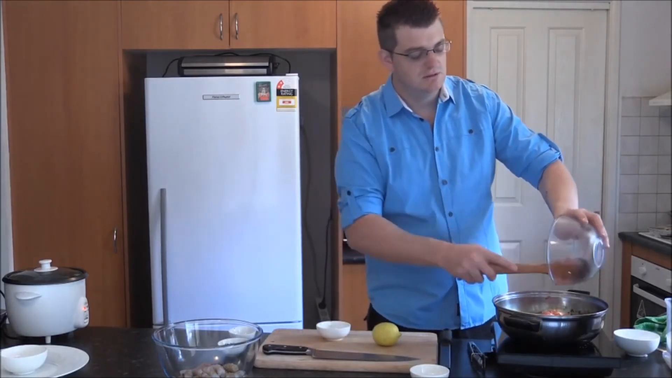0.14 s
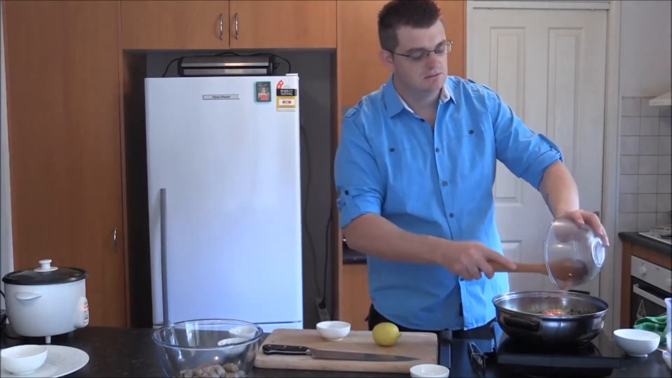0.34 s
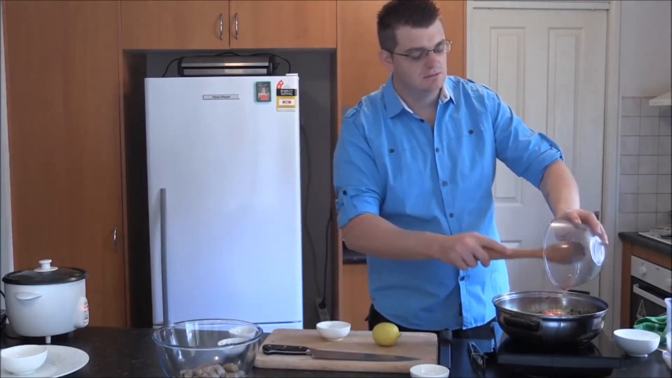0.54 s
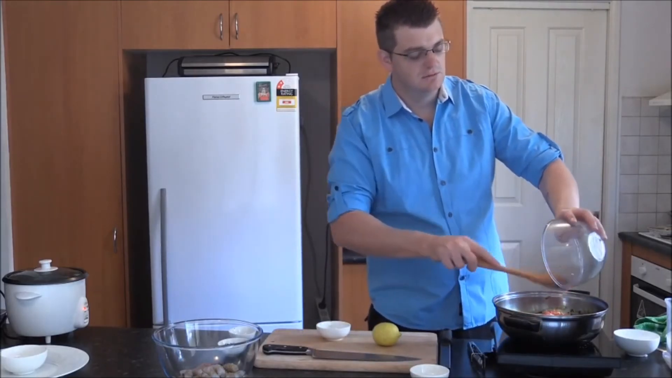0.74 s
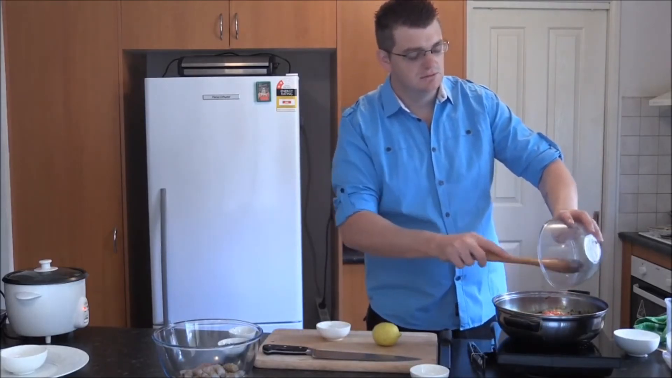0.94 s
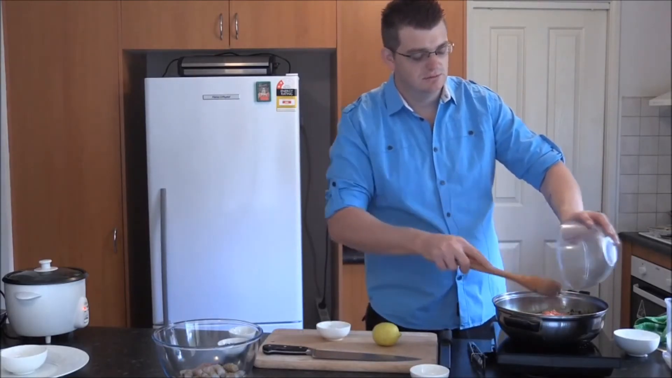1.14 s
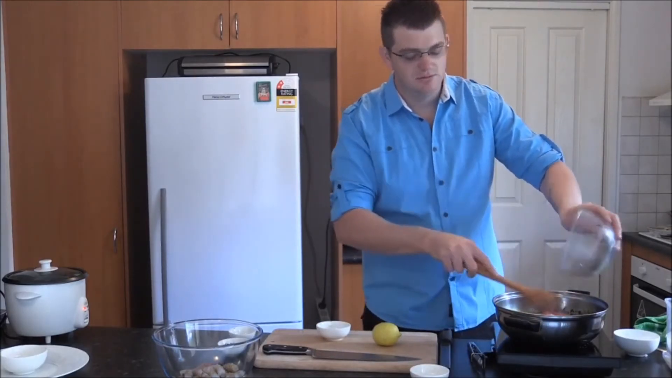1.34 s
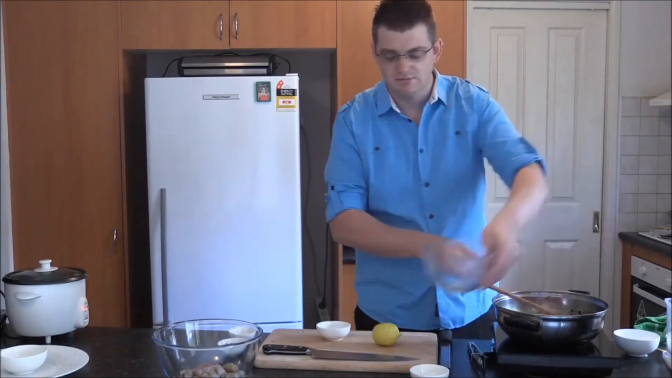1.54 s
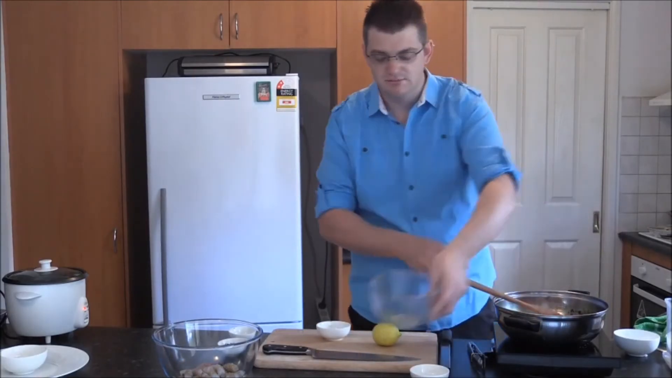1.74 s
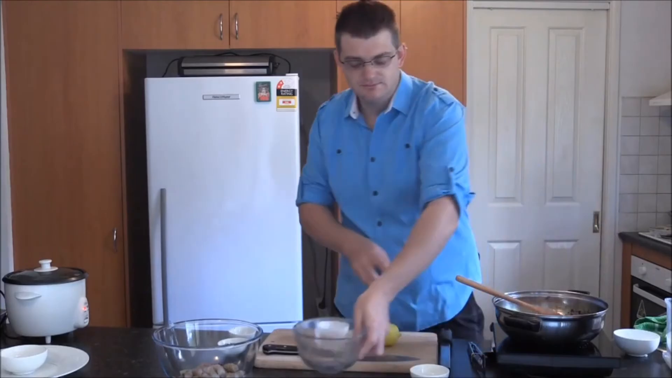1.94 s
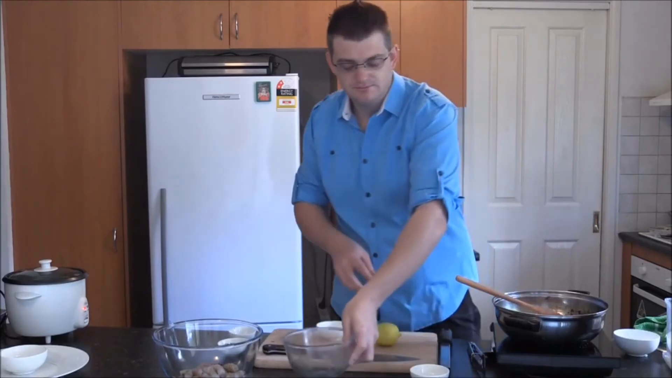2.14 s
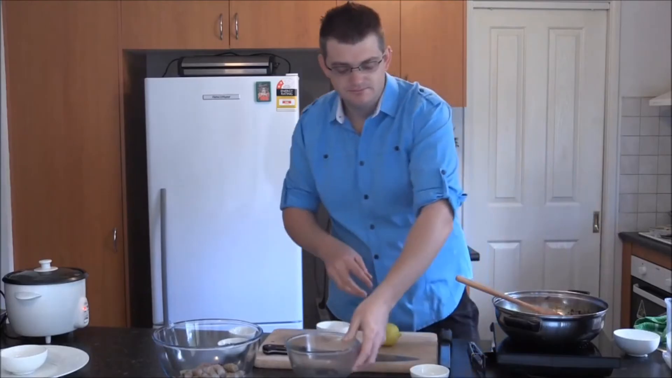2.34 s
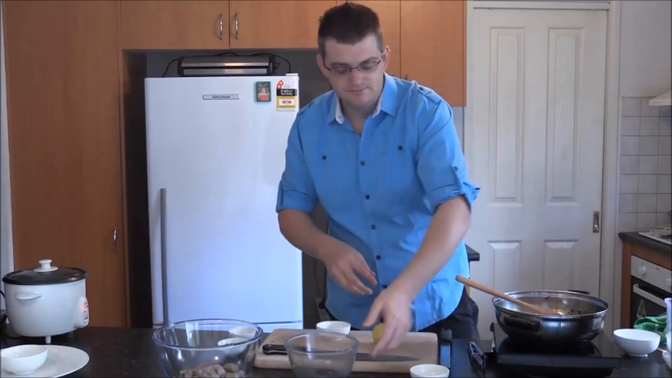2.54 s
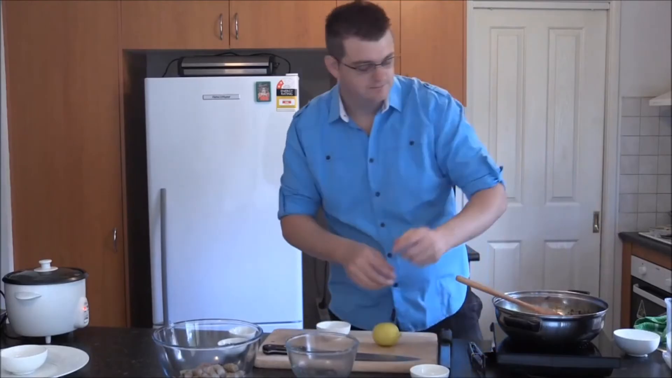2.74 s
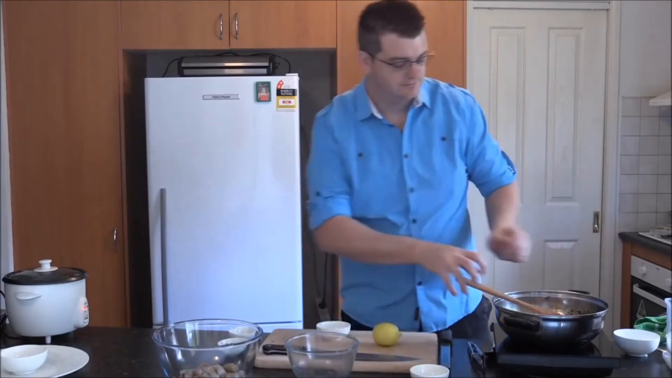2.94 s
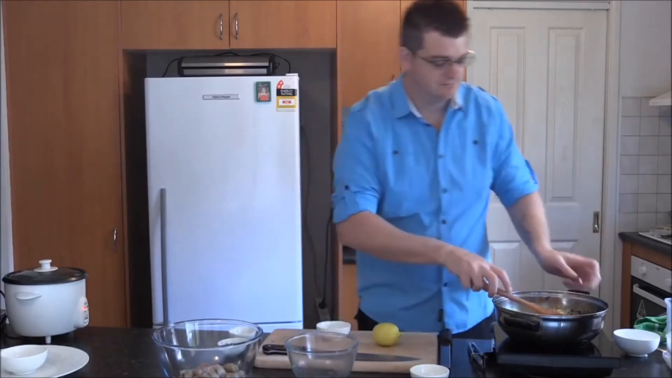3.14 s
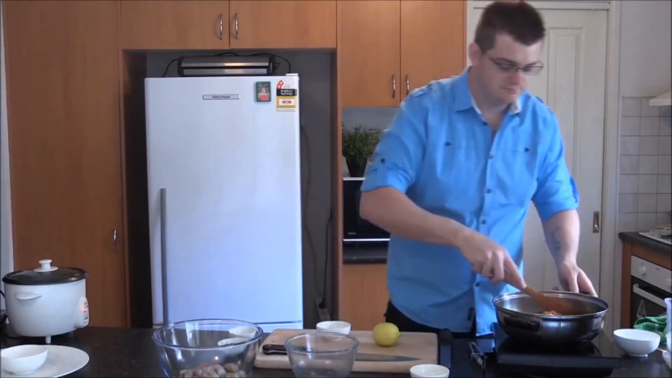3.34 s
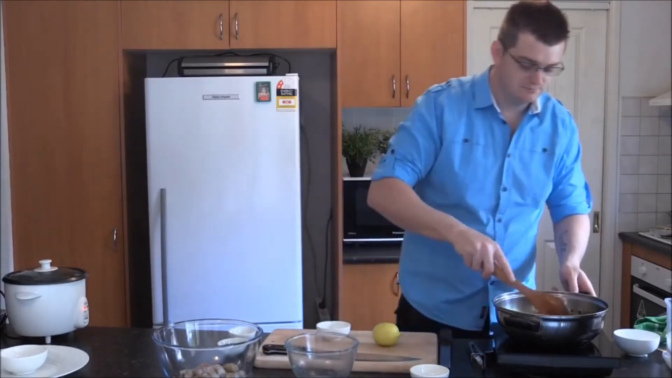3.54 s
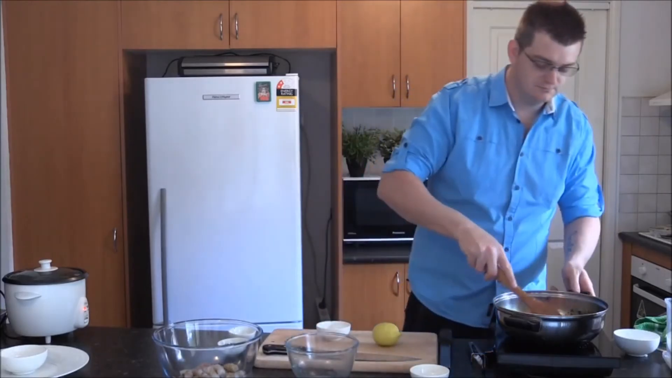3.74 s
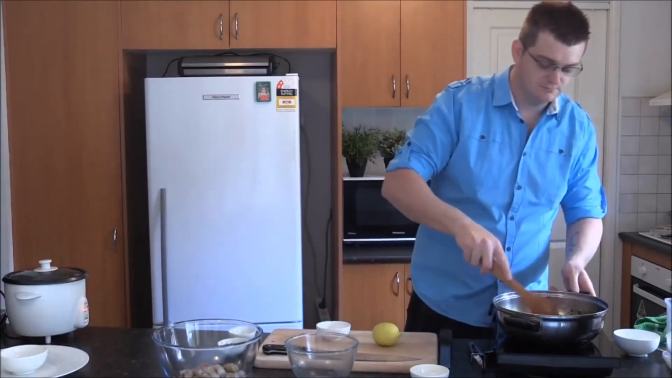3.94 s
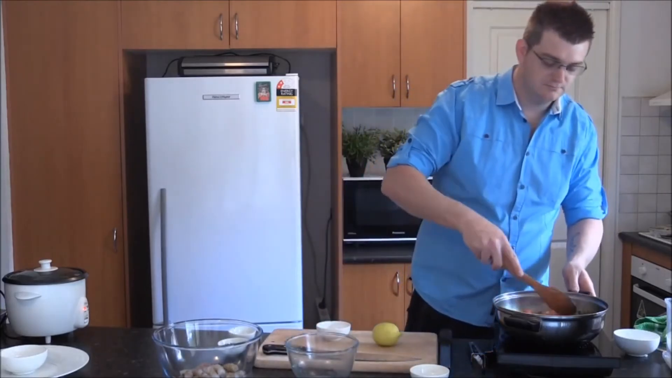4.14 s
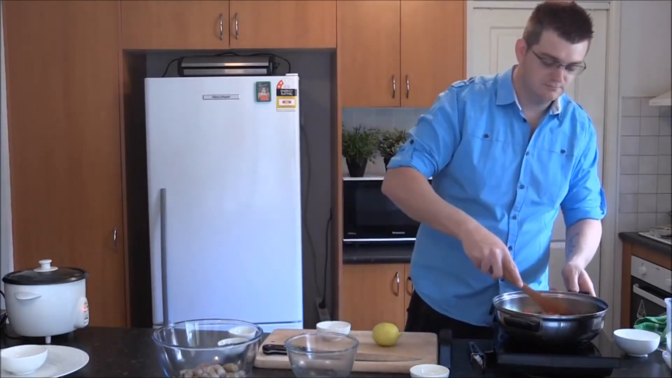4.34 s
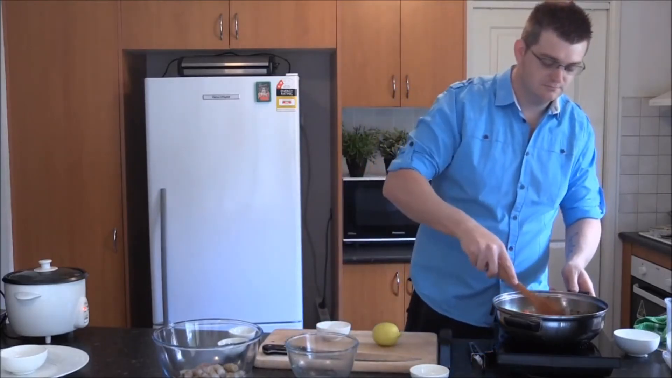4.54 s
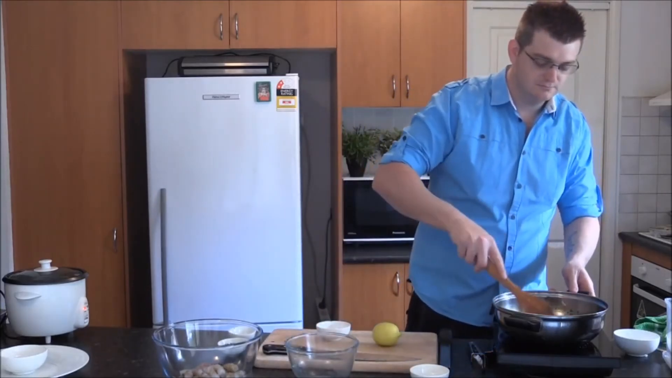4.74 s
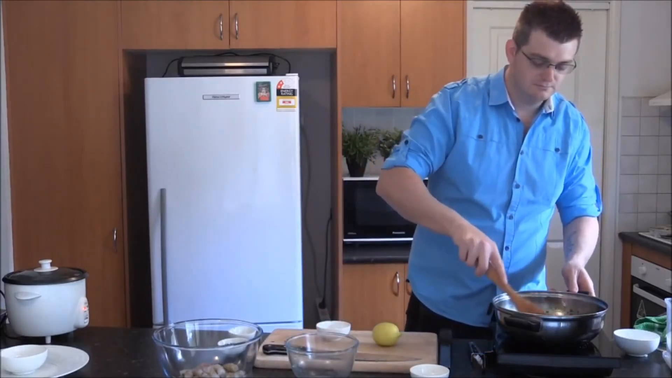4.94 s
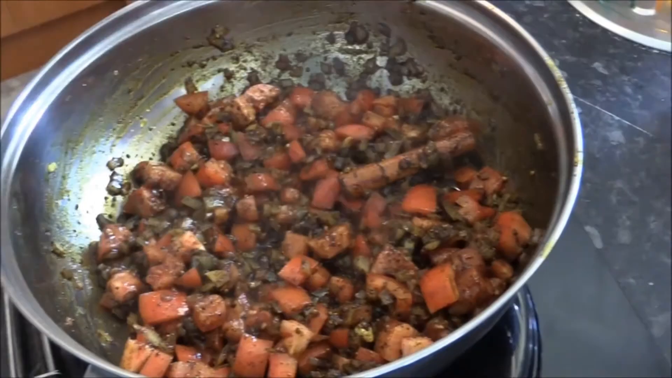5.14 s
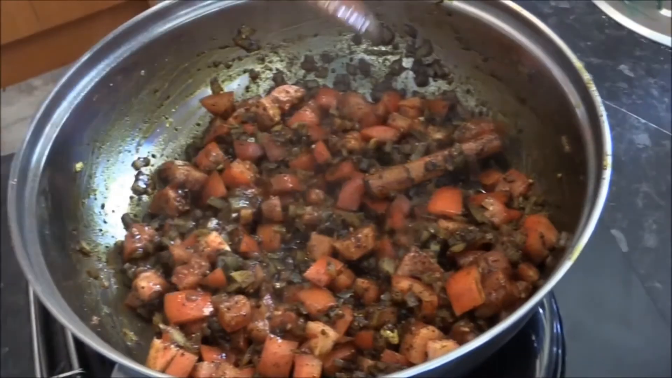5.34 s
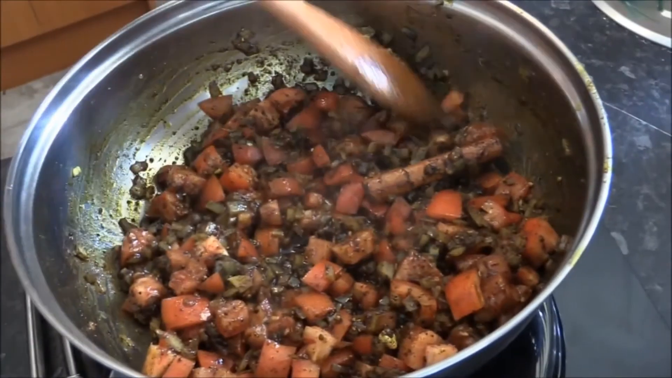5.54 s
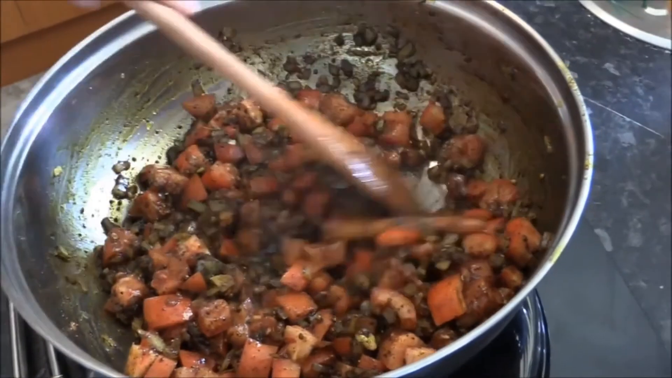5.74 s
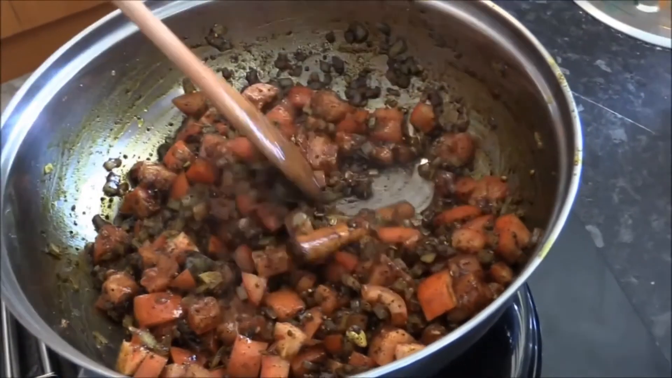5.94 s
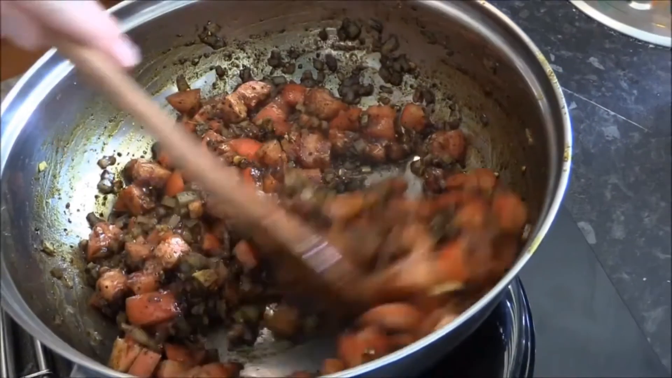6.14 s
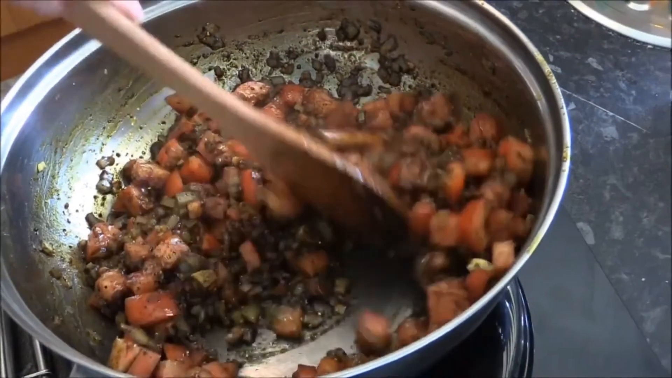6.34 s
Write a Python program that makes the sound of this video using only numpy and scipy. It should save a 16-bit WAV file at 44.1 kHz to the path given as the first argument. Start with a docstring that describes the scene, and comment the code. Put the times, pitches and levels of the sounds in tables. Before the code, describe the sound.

A wooden spoon taps a bowl over a faintly sizzling pan, the bowl thuds onto a board, then the sizzle returns close with knocks.

```python
"""Chopped tomatoes sizzle in oil, as dense random bursts, in a steel pan that hums by its resonances.
A wooden spoon taps out a bowl, and the bowl lands and rocks on a board: each blow rings decaying modes
under a noisy clack. After a short dip the sound returns close to the pan, where the spoon stirs, as
low rumble and bumps, and knocks. Kitchen echoes surround the blows; a look-ahead limiter rides the level."""
import sys
import numpy as np
from scipy import signal
from scipy.fft import rfft, irfft
from scipy.io import wavfile
from scipy.ndimage import uniform_filter1d, minimum_filter1d

SR = 44100
rng = np.random.default_rng(int(sys.argv[2]) if len(sys.argv) > 2 else 0)


def file_out(sig):
    """Save sig as 16-bit WAV at sys.argv[1]."""
    # one column per channel
    cols = np.atleast_2d(sig).T
    # limit, then scale
    lim = np.clip(cols, -1, 1)
    pcm = np.round(lim * 32767).astype(np.int16)
    wavfile.write(sys.argv[1], SR, pcm)


N = 280917
CLOSE_S = 5.338  # from here on the microphone is close to the pan


def gain_of(db):
    """A level in decibels is twenty times the logarithm of the amplitude ratio."""
    return 10 ** (np.asarray(db) / 20)


def evened(x):
    """Division by the root mean square gives unit mean power."""
    return x / np.sqrt(np.mean(x ** 2) + 1e-20)


def read(points, hz):
    """Interpolation on a logarithmic frequency axis spaces octaves evenly."""
    f, value = np.transpose(points)
    return np.interp(np.log(hz + 1), np.log(f + 1), value)


def coloured(x, gain):
    """Linear filtering multiplies each frequency bin by its own gain."""
    return irfft(gain * rfft(x), x.shape[-1])


def control(column, s):
    """Boiling and spitting vary slowly, so their levels are interpolated between points in time."""
    # the pan from across the bench, then close up: t/s, simmer level/dB, spitting fizz level/dB
    sizzle_levels = [(0, -37, -46), (1.06, -39, -45.5), (1.55, -39.5, -45.5), (2.1, -36.5, -43),
                     (2.4, -34, -44), (2.92, -39.5, -47), (3.55, -39, -46.5), (3.75, -39.5, -39.5),
                     (3.95, -40, -37.5), (4.15, -40.5, -40.5), (4.55, -38.5, -36.5), (4.96, -33, -29.5),
                     (5.15, -36, -32.5), (5.28, -31.5, -29), (5.34, -28, -30), (5.44, -30.5, -33.5),
                     (5.65, -32.5, -34), (5.84, -36, -38), (5.95, -30, -34), (6.14, -34.5, -36),
                     (6.37, -48, -39)]
    rows = np.array(sizzle_levels)
    return np.interp(s, rows[:, 0], rows[:, column])


def fineness_db(s):
    """Spectral tilt in dB per octave: harder spitting throws finer drops; close up the fizz is fuller."""
    far_tilt, close_tilt = 2.5, -2  # dB per octave at the resting fizz level
    follows, rest_db = 0.15, -50  # the tilt grows by a share of the fizz's rise
    return np.where(s < CLOSE_S, far_tilt, close_tilt) + follows * (control(column=2, s=s) - rest_db)


def bubbles(shape, pops_per_s, spread_db, pops_db, patchy_db, tilts):
    """Superposition: countless small bursts merge into hiss, larger pops stand out, partly correlated."""
    # likeness of left and right: f/Hz, correlation (0-1)
    likeness = [(60, 0.37), (180, 0.99), (550, 0.27), (1650, 0.69), (4970, 0.63), (15000, 0.69)]
    # balance of the two sides: f/Hz, left over right/dB
    balance = [(60, 7), (240, 8), (950, 1.5), (3770, 1), (15000, 0.5)]
    pop_sizes = gain_of(spread_db * np.minimum(rng.exponential(1, N), 5))
    pops = pop_sizes * (rng.random(N) < pops_per_s / SR)
    shared, apart = rng.standard_normal((2, N))
    shared = shared + gain_of(pops_db) * evened(pops * rng.choice([-1., 1.], N))
    hz, s, z = signal.stft(np.array([shared, apart]), SR, nperseg=512, noverlap=384)

    # mid and side are weighted to give the wanted correlation
    same = np.clip(read(likeness, hz), 0, 1)[:, None]
    side = np.sqrt((1 - same) / 2) * z[1]
    mid = np.sqrt((1 + same) / 2) * z[0] / np.hypot(1, gain_of(pops_db))
    pair = np.array([mid + side, mid - side])
    half_lean_db = read(balance, hz)[:, None] / 2
    lean_db = np.array([half_lean_db, -half_lean_db])

    # random patches in frequency and time
    patches = uniform_filter1d(rng.standard_normal(mid.shape), 8, 0)
    patches = evened(uniform_filter1d(patches, 30, 1))
    tilt_db = tilts * np.log2((hz[:, None] + 1) / 7000) * fineness_db(s)
    pair = pair * gain_of(read(shape, hz)[:, None] + tilt_db + patchy_db * patches + lean_db)
    return evened(signal.istft(pair, SR, nperseg=512, noverlap=384)[1][:, :N])


def sizzle():
    """Burst noise in two bands: juice simmers in the middle range, water spitting in oil fizzes on top."""
    # bubbling juice: f/Hz, relative spectral density/dB
    simmer_spectrum = [(200, -60), (500, -31), (1000, -9), (1500, -1.5), (2200, 0.5), (3200, -3.5),
                       (5000, -13), (8000, -21.5), (12000, -51), (15000, -56)]
    # spitting oil: f/Hz, relative spectral density/dB
    fizz_spectrum = [(600, -70), (1500, -69), (3000, 6), (4500, 4.5), (7000, -1.5), (10000, -9),
                     (13000, -18), (15000, -28)]
    s = np.arange(N) / SR
    simmer = bubbles(simmer_spectrum, pops_per_s=900, spread_db=2.5, pops_db=-13, patchy_db=1.5, tilts=False)
    fizz = bubbles(fizz_spectrum, pops_per_s=1500, spread_db=4.0, pops_db=-7.0, patchy_db=1.5, tilts=True)
    return gain_of(control(column=1, s=s)) * simmer + gain_of(control(column=2, s=s)) * fizz


def leaning_left(pair):
    """Intensity stereophony: the left side is 3.6 dB above the right."""
    return pair * gain_of([[1.8], [-1.8]])


def hum_db(s):
    """Forced vibration: the steel hums louder as the juice boils harder."""
    far_db, close_db = -40.5, -27  # at the resting simmer level
    follows, rest_db = 0.25, -36  # the hum rises by a share of the simmer's rise
    return np.where(s < CLOSE_S, far_db, close_db) + follows * (control(column=1, s=s) - rest_db)


def steel_hum():
    """Resonance: the boiling shakes the steel, its modes stand out and one holds an almost steady note."""
    # dull part of the pan's hum: f/Hz, relative spectral density/dB
    drone = [(88, -59), (150, -17), (280, -4.5), (346, -6), (898, -5.5), (1080, -4), (1180, -6),
             (2500, -22), (3250, -61), (5500, -120)]
    # resonances of the pan: f/Hz, full width at half amplitude/Hz, relative level/dB
    resonances = [(351.5, 62, -4.5), (480.7, 8.1, 1), (693.4, 40, -9.5), (1040, 19, -15.5),
                  (1592, 29, -6.5), (2102, 17, -9)]
    hz = np.fft.rfftfreq(N, 1 / SR)
    shared, apart = rng.standard_normal((2, N))
    ring_power = 0
    for f, width, db in resonances:
        ring_power = ring_power + gain_of(db) ** 2 / (1 + (2 * (hz - f) / width) ** 2) ** 2
    side = coloured(apart, gain_of(read([(150, -10), (400, -14.0), (1500, -5)], hz)))
    steel_gain = np.hypot(gain_of(read(drone, hz)), gain_of(7.5) * np.sqrt(ring_power))
    steel = coloured(np.array([shared + side, shared - side]), steel_gain)

    # the note wavers slowly in level and in pitch
    waver = uniform_filter1d(rng.standard_normal((2, N)), 3000)
    waver = evened(uniform_filter1d(waver, 3000))
    note_hz = 1084 + 2.72 * waver[1]
    note_gain = gain_of(-6.5 + 0.72 * waver[0])  # against the unit-rms steel
    note = note_gain * np.sin(2 * np.pi * np.cumsum(note_hz) / SR)
    return leaning_left(gain_of(hum_db(np.arange(N) / SR)) * (evened(steel) + note))


def rumble_gain(s):
    """Amplitudes add: soft bell-shaped bumps top a bed that steps up with stirring and again close up."""
    # low bumps while stirring: t/s, peak level/dB, half length to 1/e/s
    bumps = [(3.984, -51, .05), (4.615, -56, .05), (5.795, -30.5, 0.052), (6.1, -44.5, 0.44)]
    stir_from_s, far_db, stirred_db, close_db = 3.7, -61.5, -57.5, -48.5
    bed_db = np.select([s < stir_from_s, s < CLOSE_S], [far_db, stirred_db], close_db)
    return gain_of(bed_db) + sum(gain_of(db) * np.exp(-((s - at) / half) ** 2) for at, db, half in bumps)


def rumble():
    """Structure-borne sound: stirring rumbles through stove and bench as low coloured noise."""
    # stove and bench: f/Hz, relative spectral density/dB
    rumble_spectrum = [(25, -7.5), (50, -9), (70, 3), (100, -9.5), (140, 1.5), (200, -11), (300, -20),
                       (600, -90)]
    hz = np.fft.rfftfreq(N, 1 / SR)
    low, apart = rng.standard_normal((2, N))
    side = coloured(apart, gain_of(read([(30, 19), (70, -7), (150, -17)], hz)))
    pair = coloured(np.array([low + side, low - side]), gain_of(read(rumble_spectrum, hz)))
    return leaning_left(rumble_gain(np.arange(N) / SR) * evened(pair))


def kitchen(x):
    """Reverberation: sparse echoes of random sign, each band decaying at its own rate, the bass alike."""
    # reverberation of the kitchen: f/Hz, t60/s
    decay = [(200, 0.31), (800, 0.29), (2000, 0.38), (5000, 0.29), (12000, 0.28)]
    taps = np.zeros((2, SR // 2))
    starts = np.arange(150, SR // 2 - 20, 20)
    at = starts + rng.integers(0, 20, (2, len(starts)))  # one echo in every 20 samples
    np.put_along_axis(taps, at, rng.choice([-1., 1.], at.shape), 1)
    hz, t, (mid, side) = signal.stft(taps, SR, nperseg=256)
    side_db = read([(150, -30), (500, -5), (2000, -5.5), (10000, -4.5)], hz)
    side = side * gain_of(side_db)[:, None]
    dying = gain_of(-60 * t / read(decay, hz)[:, None])
    tail = signal.istft(np.array([mid + side, mid - side]) * dying, SR, nperseg=256)[1]
    return signal.fftconvolve(x[None], tail / np.linalg.norm(tail[0]), axes=1)[:, :len(x)]


def blows(events, modes, clack, clack_db, clack_t60, contact_s, room_db):
    """Modal synthesis: hardness and place weight the decaying modes of a struck body, under a noisy clack."""
    hz, db, t60, by_place_db = np.transpose(modes)[:, :, None]
    t = np.arange(SR // 2) / SR
    out = np.zeros((2, N + SR))
    bins = np.fft.rfftfreq(len(t), 1 / SR) + 1
    # little radiates under the lowest mode
    radiation = signal.butter(4, .85 * hz.min(), "high", fs=SR, output="sos")
    clack_follows = .7  # share of the place colouring that the clack takes on
    for s, blow_db, hard_db, place, lean_db in events:
        place_db = 2 * by_place_db * (place - .5)
        weight_db = db + hard_db * np.log2(hz / 1000) + place_db
        waves = np.sin(2 * np.pi * (hz * t + rng.random(hz.shape)))
        ring = (gain_of(weight_db - 60 * t / t60) * waves).sum(0)
        ring = ring / np.linalg.norm(gain_of(weight_db))

        clack_place_db = clack_follows * read(np.hstack([hz, place_db]), bins)
        colour_db = read(clack, bins) + clack_place_db + hard_db * np.log2(bins / 1000)
        noise = evened(coloured(rng.standard_normal(len(t)), gain_of(colour_db)))
        sound = ring + noise * gain_of(clack_db - 60 * t / clack_t60)
        sound = sound * (1 - np.exp(-t / contact_s))  # the contact softens the onset
        sound = signal.sosfilt(radiation, sound)

        echoes = kitchen(sound)
        echoes = echoes * np.linalg.norm(sound) / np.linalg.norm(echoes[0])
        at = round(s * SR)
        sides = gain_of(blow_db + np.array([[lean_db], [-lean_db]]) / 2)
        out[:, at:at + len(t)] += sides * (sound + gain_of(room_db) * echoes)
    return out[:, :N]


def bowl_taps():
    """Impact excitation: the wooden spoon rings the modes of the bowl's wall, changing with place."""
    # spoon on the bowl: t/s, blow level/dB, hardness/dB per octave, place on the wall (0-1),
    # left over right/dB
    taps = [(.309, -6.5, 3.5, 0.13, 2), (.464, -10, 2, 0.16, 3), (.647, -9, -2.5, 0.53, 2),
            (.880, -11.5, -5, 0.99, 2.5), (1.218, -23.5, -4, 0.64, 3)]
    # modes of the bowl: f/Hz, relative level/dB, t60/s, gain from place .5 to 1/dB
    bowl_modes = [(691, -5.5, 0.042, -22.5), (786, -28.5, 0.39, 14), (1270, 5.5, 0.013, -12.5),
                  (1440, 2, 0.016, -8.5), (1660, -4.5, 0.14, -6.5), (1715, 0, 0.14, 0),
                  (1695, -2, 0.09, -5), (2080, -25, 0.065, 2), (2304, 3.5, 0.021, 10.5),
                  (2546, 4.5, 0.028, -3), (2860, -12, 0.037, 0), (3055, -2.5, 0.18, -0.5),
                  (3100, 7.5, 0.044, 5), (3680, -30, 0.026, 3), (4240, -9, 0.019, 2.5)]
    # damped modes too close to tell apart: f/Hz, relative spectral density/dB
    bowl_clack = [(300, -13), (670, -2), (1000, -22.5), (1600, 10.5), (2100, -0.5), (3100, -6),
                  (4500, -5.5), (6500, -15.5), (8200, -24.5), (9600, -20.5), (11500, -32), (14000, -63)]
    return blows(taps, bowl_modes, bowl_clack, clack_db=-1.5, clack_t60=.06, contact_s=.0003, room_db=4.5)


def rocking(count=4):
    """Repeated impact: every landing is followed by a few weaker, uneven contacts."""
    # the bowl lands, then rocks on the board: t/s, blow level/dB, rocking time/s,
    # hardness/dB per octave, place (0-1), left over right/dB
    landings = [(1.918, -19.5, .05, -2.5, 0.4, 4.5), (2.487, 5.5, 0.059, 3, 0.41, 3),
                (2.547, 5, .075, 5, 0.38, 4), (2.642, 1.5, .075, 1, 0.63, 4)]
    rock_db, fade_db, spread_db, jitter = -3, -4, 1.5, .4  # later contacts against the landing
    rows = []
    for s, blow_db, length, hard_db, place, lean_db in landings:
        rows.append((s, blow_db, hard_db, place, lean_db))
        for k, (late, strong) in enumerate(rng.uniform(-1, 1, (count, 2))):
            share = (k + 1 + jitter * late) / (count + 1)
            level_db = blow_db + rock_db + fade_db * share + spread_db * strong
            rows.append((s + share * length, level_db, hard_db, place, lean_db))
    return rows


def bowl_landings():
    """Impact excitation: the landing and rocking bowl rings the board with a softer contact."""
    # modes of the board: f/Hz, relative level/dB, t60/s, gain from place .5 to 1/dB
    board_modes = [(146.3, -16, 0.33, 8), (212, -9, 0.13, -18), (308, -27, 0.044, 1), (365, -3, 0.013, 2),
                   (457, 8, 0.0057, -17.5), (703, 19.5, 0.0072, 0), (824, 0, 0.031, -5.5),
                   (1344, -8, 0.073, 6.5), (7780, -41, 0.16, 12)]
    # noisy part of the thud: f/Hz, relative spectral density/dB
    board_clack = [(59, -63), (100, -57), (170, -11), (492, -3.5), (625, -9), (795, -4), (1120, -17),
                   (1280, -20), (6000, -64), (7800, -91), (13200, -120)]
    return blows(rocking(), board_modes, board_clack, clack_db=-7.0, clack_t60=0.06, contact_s=0.0012,
                 room_db=-1.0)


def pan_knocks():
    """Damped vibration: the spoon knocks the loaded pan, whose modes die quickly."""
    # spoon on the loaded pan: t/s, blow level/dB, hardness/dB per octave, place (0-1), left over right/dB
    knocks = [(5.433, -17.5, -8.5, 0.5, 5.0), (5.559, -19, -4.5, 0.5, 4), (5.664, -19, -5, 0.5, 2),
              (5.854, -11.5, 6, 0.5, -7), (6.326, 6.5, -1.5, 0.5, 5.5)]
    # modes of the loaded pan: f/Hz, relative level/dB, t60/s, gain from place .5 to 1/dB
    pan_modes = [(144.4, -18, 0.24, 0), (350, 9.5, 0.09, 0), (490, -8, 0.092, 0), (685, 5, 0.062, 0),
                 (1080, -6, 0.034, 0), (1410, 13.5, 0.017, 0), (1780, 8, 0.021, 0), (2710, 20, 0.0034, 0)]
    # noisy part of the knock: f/Hz, relative spectral density/dB
    pan_clack = [(59, -38), (130, -11), (422, 5), (927, -4.5), (1810, -16), (2150, -22), (3180, -16),
                 (6000, -55), (7800, -94), (13200, -120)]
    return blows(knocks, pan_modes, pan_clack, clack_db=-11, clack_t60=0.046, contact_s=0.00098,
                 room_db=-7.5)


def gap_db(s):
    """Gain envelope: the level drops, fades to a hush and comes back quickly."""
    cut_s, cut_fall_s, cut_drop_db, fade_db_per_s = 5.278, .004, -10, -950
    hush_db, back_s, back_rise_s = -47, 5.343, .0055
    after = np.maximum(s - cut_s, 0)
    falling = cut_drop_db * np.minimum(after / cut_fall_s, 1) + fade_db_per_s * after
    rising = hush_db * np.clip((back_s - s) / back_rise_s, 0, 1)
    return np.maximum(falling, rising)


def scene():
    """Linear superposition: the sound pressures of all sources add."""
    return sizzle() + steel_hum() + rumble() + bowl_taps() + bowl_landings() + pan_knocks()


def record(dry):
    """Gain control: a limiter ducks ahead of peaks and the gap dips; then saturation and band limits."""
    ahead = round(0.023 * SR)
    peak_db = 20 * np.log10(uniform_filter1d(abs(dry).max(0), 40) + 1e-9)
    over_db = np.maximum(peak_db + 11.0, 0)  # excess above -11 dB
    # the largest excess within the look-ahead
    padded_db = np.append(over_db, np.zeros(ahead))
    seen_db = -minimum_filter1d(-padded_db, ahead)[ahead // 2:][:N]
    fall = np.arange(N) * 44.0 / SR  # the held excess falls by 44 dB a second
    held_db = np.maximum.accumulate(seen_db + fall) - fall
    duck_db = 0.58 * uniform_filter1d(held_db, 120)  # only this share of the excess is taken away
    out = dry * gain_of(gap_db(np.arange(N) / SR) - duck_db)
    out = 1.648 * np.tanh(out / 1.02)  # the preamplifier rounds the highest peaks
    # the microphone sheds deep bass
    out = signal.sosfilt(signal.butter(2, 75, "high", fs=SR, output="sos"), out)
    treble_limit = signal.firwin(801, 15450, window=("kaiser", 9), fs=SR)  # edge in Hz
    return signal.oaconvolve(out, treble_limit[None], "same")


dry = scene()
out = record(dry)
file_out(out)
```